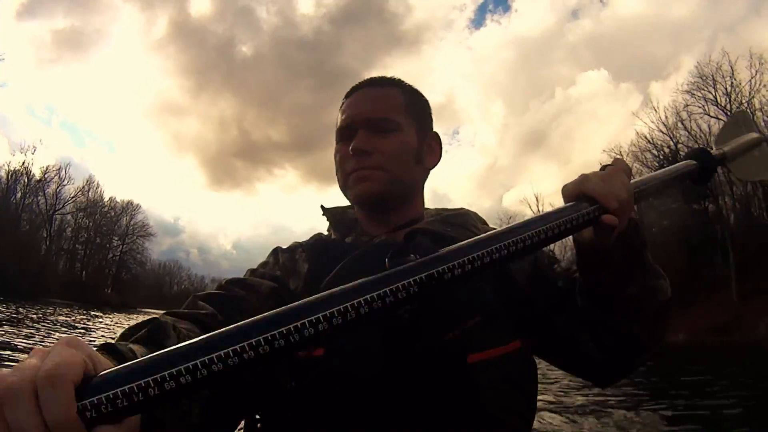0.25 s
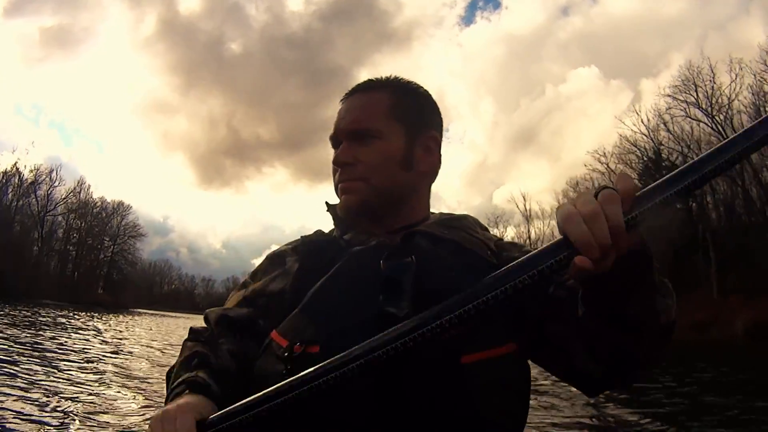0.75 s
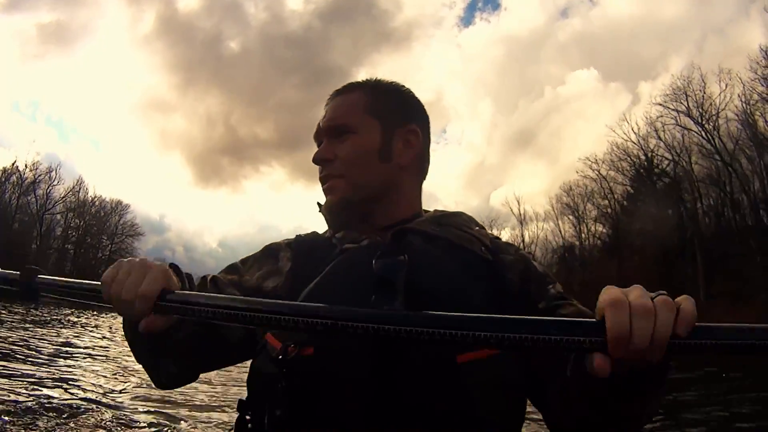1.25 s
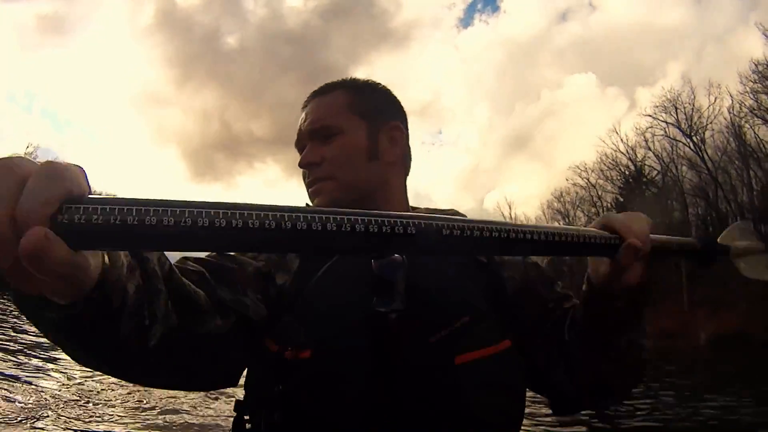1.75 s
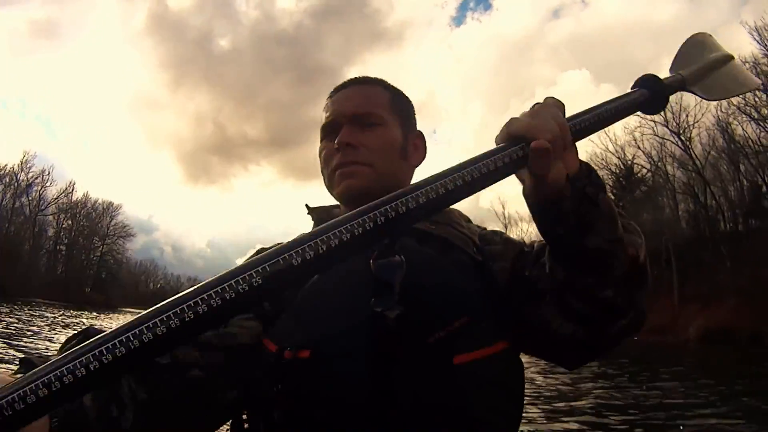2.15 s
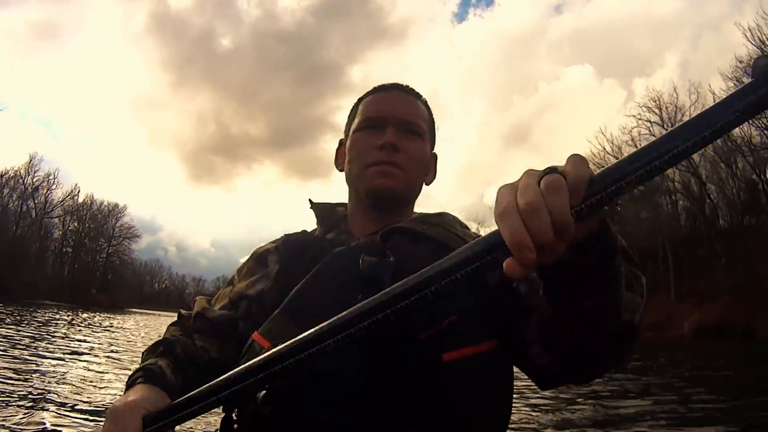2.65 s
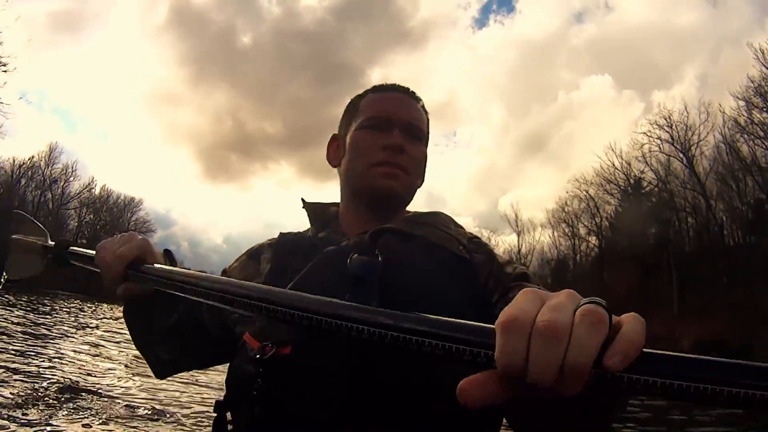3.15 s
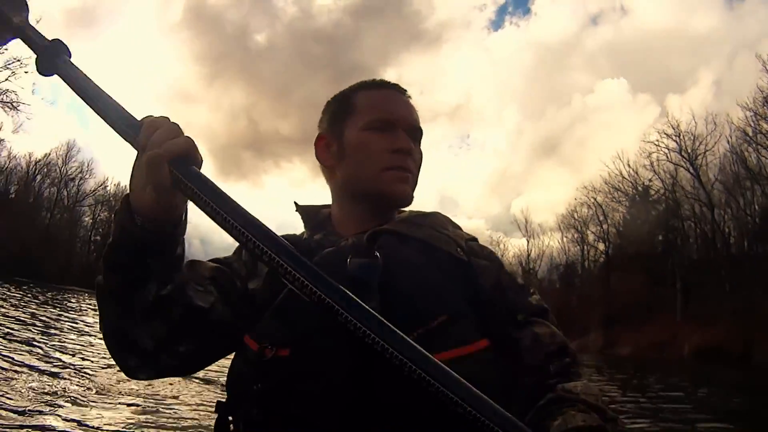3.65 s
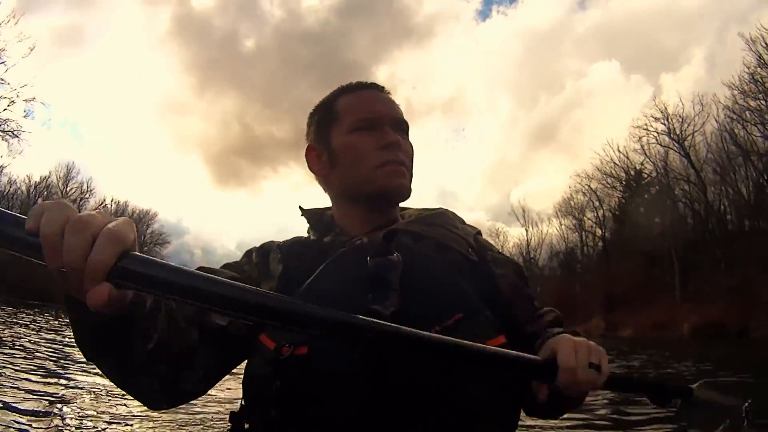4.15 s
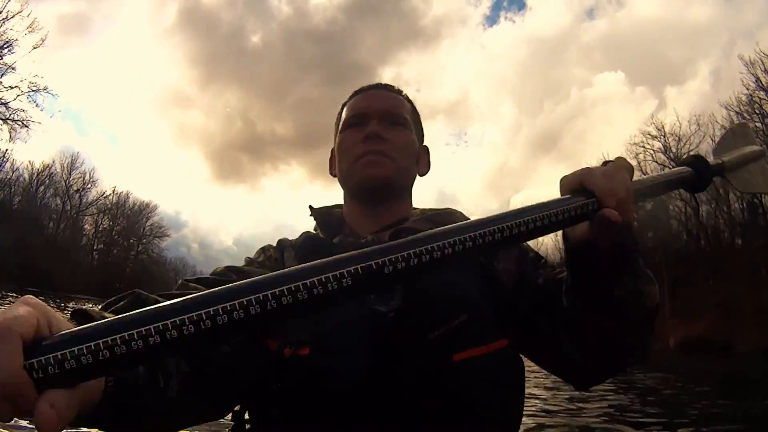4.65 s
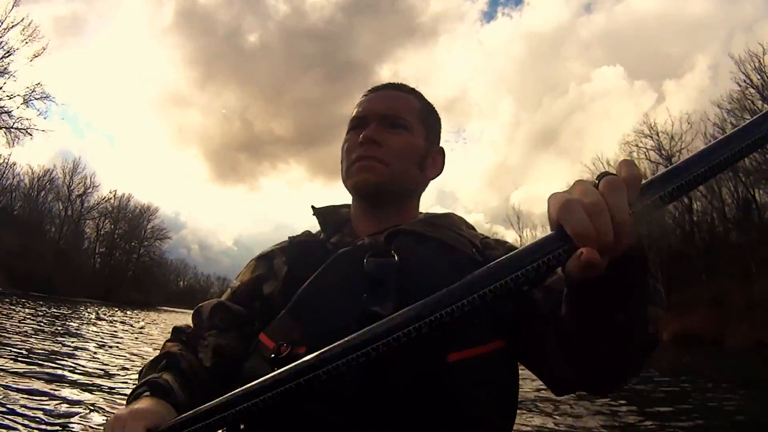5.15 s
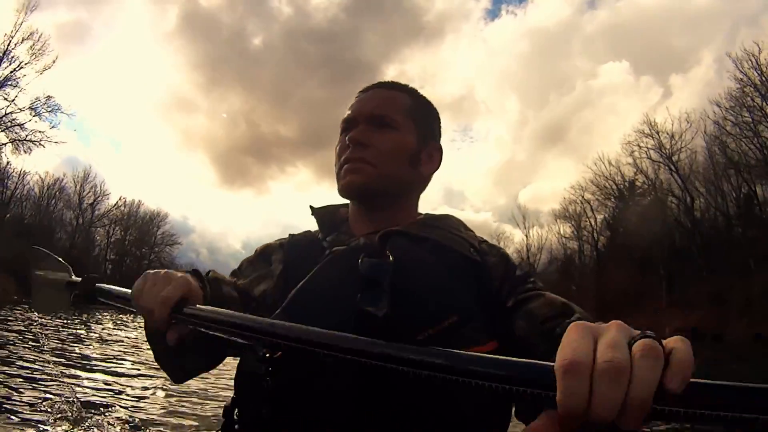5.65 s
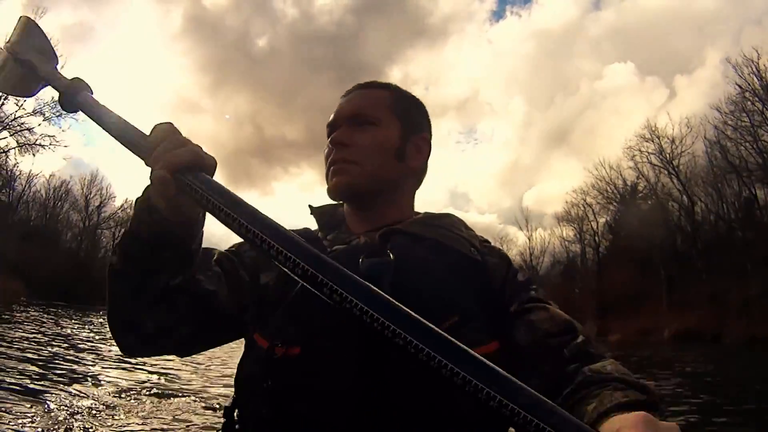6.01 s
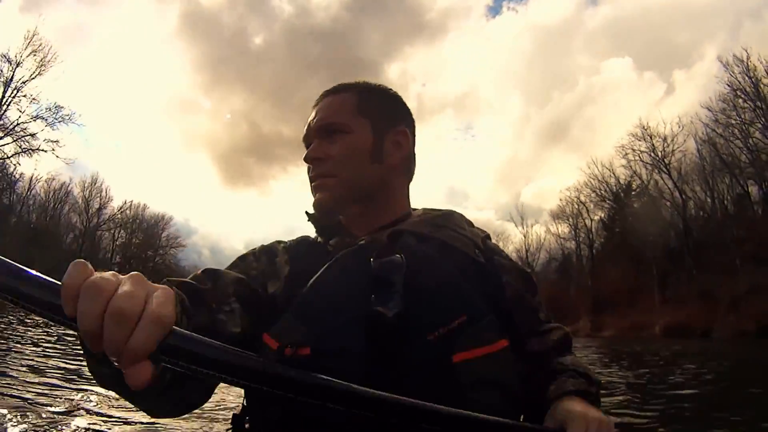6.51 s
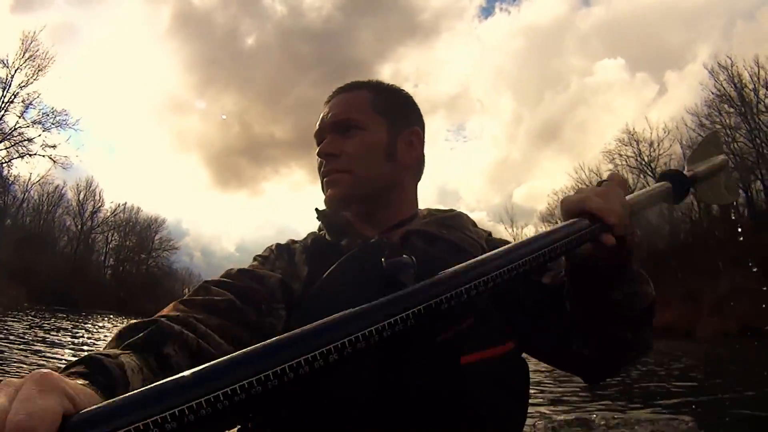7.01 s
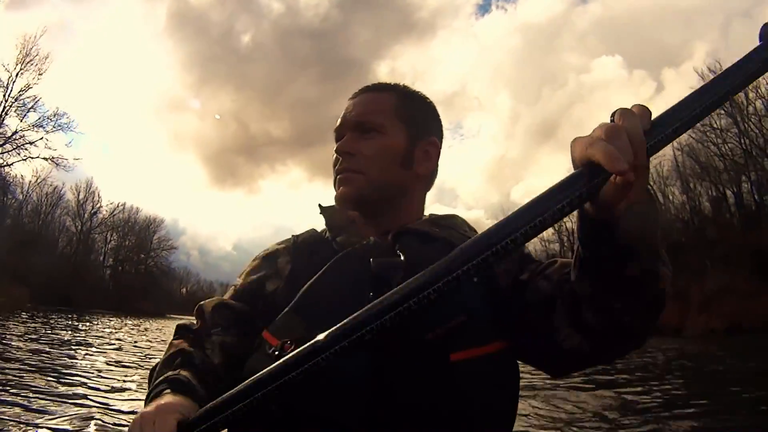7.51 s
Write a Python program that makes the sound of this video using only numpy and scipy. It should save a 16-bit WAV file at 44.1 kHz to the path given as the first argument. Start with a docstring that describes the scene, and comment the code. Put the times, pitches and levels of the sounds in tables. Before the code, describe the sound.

A quiet kayak on open water, heard close from a cased stereo microphone on deck, with little treble at the very top, faint air hiss and a low hull hum. A stroke is already streaming at 0 s; others swell near 1.1, 3.0, 4.2, 5.5 and, strongest, 6.5 s, each a bubbly, fizzing splash that drains into trickles. Between them come small splashes, sharp ticking drips, short swishes, and hollow gulps and slaps along the hull, one clear gulp at 1.4 and another at 6.4. Thin high bird whistles glide faintly from 1.2 to 2.9, clearest at 3.4-4.0, again around 5-6.2 and very faintly at 7.3, with a soft tree echo. At 3.7 a dull, boomy knock hits the hull with a jolt. At 7.5 a louder hollow thud rattles, followed by three lesser bumps until about 7.7 and a last swish.

```python
"""Kayak paddle blades stir a calm lake: bursts of tiny ringing bubbles and filtered noise make the spray.
Gulps and drops are air pockets that ring, with slaps of the wet hull or sharp ticks; swishes are brief noise.
Small birds whistle thinly as gliding sines with a tree echo; hiss and a low hull hum lie beneath.
Twice the hollow hull takes a dull knock, built from decaying modes, and the second is followed by lesser ones.
All is heard through the two ports of a cased camera on the deck."""
import sys
import numpy as np
from scipy import signal
from scipy.fft import rfft, irfft
from scipy.io import wavfile
from scipy.ndimage import uniform_filter1d

SR = 44100
rng = np.random.default_rng(int(sys.argv[2]) if len(sys.argv) > 2 else 0)


def dump_mix(stems):
    """Bounce the given channels to the path in sys.argv[1] as a 16-bit WAV at rate SR."""
    frames = np.atleast_2d(stems).T  # one column per channel
    limited = np.clip(frames, -1, 1)  # hard clip at full scale
    pcm = np.round(limited * 32767).astype(np.int16)
    wavfile.write(sys.argv[1], SR, pcm)


N = 342857  # samples
TIME = np.arange(N) / SR  # s
FREQS = np.fft.rfftfreq(N, 1 / SR)  # Hz


def amp(db):
    """Decibel law: converts a level in dB to an amplitude gain."""
    return 10 ** (np.asarray(db) / 20)


def unit(x):
    """Normalisation: scales a signal to an rms of 1."""
    return x / np.sqrt(np.mean(x ** 2) + 1e-20)


def read(points, hz):
    """Interpolation: reads a table along a log-frequency axis."""
    f, value = np.transpose(points)
    return np.interp(np.log(hz + 1), np.log(f + 1), value)


def coloured(x, points):
    """Linear filtering: shapes a sound by a table of hz and level_db, then sets its rms to 1."""
    return unit(irfft(rfft(x) * amp(read(points, FREQS)), N))


def panned(x, pan_db):
    """Level difference: raises left and lowers right by half of pan_db each."""
    return np.array([amp(pan_db / 2), amp(-pan_db / 2)]).reshape(2, -1) * x


def noise(apart, size=N):
    """Partial coherence: white noise for two ports, a common part plus an opposed part scaled by apart."""
    mid, side = rng.standard_normal((2, size))
    return unit(np.array([mid + apart * side, mid - apart * side]))


def drift(hz):
    """Band-limited fluctuation: a random curve of rms 1, slower than about hz."""
    return unit(irfft(rfft(rng.standard_normal(N)) * np.exp(-(FREQS / hz) ** 2), N))


def add(mix, s, sound):
    """Superposition: adds a sound into the mix, in place, at time s."""
    part = mix[:, max(round(s * SR), 0):][:, :sound.shape[-1]]
    part += sound[..., :part.shape[1]]


def bubble(hz, t60, glide, onset):
    """Bubble resonance: an air pocket rings and dies; a positive glide is its climb as it nears the surface."""
    t = np.arange(int(max(t60, .001) * SR)) / SR
    ring = np.sin(2 * np.pi * hz * t * (1 + glide * t / t60 / 2))
    ring *= amp(-60 * t / t60)
    ring *= 1 - np.exp(-(t / onset) ** 2)
    return ring / (abs(ring).max() + 1e-12)


def swarm(per_s, low_hz, high_hz, cycles, glide, spread_db, width_db, count=48):
    """Shot noise: bubbles of many sizes burst at random moments, each size from its own direction."""
    out = np.zeros((2, N))
    sizes_hz = np.geomspace(low_hz, high_hz, count)
    for hz, (life, bend, place, lag) in zip(sizes_hz, rng.standard_normal((count, 4))):
        t60 = cycles * np.exp(.5 * life) / hz
        ring = bubble(hz, t60, glide * (1 + 2 * bend), t60 / 10)
        at, size = rng.random((2, 1500))
        born = int(min(per_s * N / SR / count, len(at)))
        # exponentially distributed levels, limited at 3.5 times spread_db
        size_db = spread_db * np.minimum(-np.log(size[:born]), 3.5)
        moments = (at[:born] * N).astype(int)
        train = np.bincount(moments, amp(size_db), N)
        sound = signal.oaconvolve(train, ring * np.sqrt(hz) / np.linalg.norm(ring))[:N]
        delayed = np.roll(sound, round(lag * .8))  # lag in samples
        out += panned(np.array([sound, delayed]), width_db * place)
    return unit(out)


RISE_DB = 22  # swell of the water over each rise time


def surge(s, rise_s, hold_s, fall_db_per_s):
    """Exponential growth and decay: water wells up until time s, keeps running, then dies away."""
    rise_db = -RISE_DB * np.maximum(s - TIME, 0) / rise_s
    fall_db = -fall_db_per_s * np.maximum(TIME - s - hold_s, 0)
    return amp(rise_db + fall_db)


# a blade sweeps back and lifts out, streaming:
# (peak_start_s [s], rise_s [s], hold_s [s], spray_db [dB], churn_db [dB], lap_db [dB], left_right_db [dB])
BLADE_STROKES = [(0.0, .05, .06, -48, -52, -52, -2), (1.06, 0.23, 0.15, -47, -67.5, -60, 1.5),
                 (3.019, .1, 0.14, -48, -58, -49.5, 3.5), (4.208, 0.079, 0.22, -44, -55, -56, -1),
                 (5.473, 0.18, 0.35, -49, -62, -61.5, 2), (6.537, 0.11, 0.22, -40.5, -48.5, -49.5, -3)]
# small splashes, as a blade cuts in or sheds a string of water:
# (peak_start_s [s], hold_s [s], spray_db [dB], churn_db [dB], left_right_db [dB])
SMALL_SPLASHES = [(0.342, 0.043, -46.5, -59, 5), (0.725, 0.095, -58, -58.5, 5),
                  (1.057, 0.016, -43.5, -50, 2), (1.179, 0.023, -50, -55, -4), (1.961, 0.1, -48, -60, 6.5),
                  (2.382, 0.092, -49, -59.5, 3), (2.887, 0.075, -48, -56, 4), (3.016, 0.028, -42.5, -49, 1),
                  (3.512, 0.018, -47.5, -68, 0), (3.697, 0.062, -54, -59, 0), (4.076, 0.16, -51, -52, -6),
                  (4.31, 0.054, -41.5, -56, -4), (4.754, 0.081, -53, -57.5, 4), (4.955, 0.19, -58, -61, 5),
                  (5.461, 0.032, -42.5, -56, -0.5), (5.593, 0.037, -49, -45, 3),
                  (5.976, 0.086, -48.5, -60, -2.5), (6.832, 0.21, -45, -61, -3),
                  (7.118, 0.047, -49, -55, 0), (7.196, 0.042, -49, -60, -2), (7.288, 0.08, -49.5, -65, -1)]
DRAIN_DB_PER_S, SETTLE_DB_PER_S = 79, 64  # the blade drains quickly, the lake settles more slowly
TRICKLE_DB, TRICKLE_DB_PER_S = -12.5, 18  # a raised blade trickles on; level relative to the stream
SPLASH_RISE_S, SPLASH_FALL_DB_PER_S = 0.0046, 330
# between strokes the gliding hull keeps a little water moving
CALM_SPRAY_DB, CALM_CHURN_DB, CALM_LAP_DB = -59, -63, -61.5


def stirring():
    """Power addition: strokes, splashes and calm gliding sum as powers to drive spray, churn and lapping."""
    spray, churn, lap = amp(CALM_SPRAY_DB) ** 2, amp(CALM_CHURN_DB) ** 2, amp(CALM_LAP_DB) ** 2
    for s, rise, hold, spray_db, churn_db, lap_db, pan_db in BLADE_STROKES:
        stream = surge(s, rise, hold, DRAIN_DB_PER_S)
        wake = surge(s, rise, hold, SETTLE_DB_PER_S)
        trickle = amp(TRICKLE_DB) * surge(s, rise, hold, TRICKLE_DB_PER_S)
        spray = spray + panned(amp(spray_db) * np.hypot(stream, trickle), pan_db) ** 2
        churn = churn + (amp(churn_db) * stream) ** 2
        lap = lap + (amp(lap_db) * wake) ** 2
    for s, hold, spray_db, churn_db, pan_db in SMALL_SPLASHES:
        burst = surge(s, SPLASH_RISE_S, hold, SPLASH_FALL_DB_PER_S)
        spray = spray + panned(amp(spray_db) * burst, pan_db) ** 2
        churn = churn + (amp(churn_db) * burst) ** 2
    return np.sqrt(spray), np.sqrt(churn), np.sqrt(lap)


# spectrum of the spray's small bubbles and fizz: (hz [Hz], level_db [dB, relative])
SPRAY_COLOUR = [(1200, -14.5), (2100, -9.5), (2600, 2.5), (3300, -3.5), (4100, -6), (5100, -2), (6400, -11),
                (7600, -5.5), (8800, -13), (10000, -22), (11000, -20.5)]
# spectrum of the larger bubbles and foam below: (hz [Hz], level_db [dB, relative])
CHURN_COLOUR = [(500, -41), (900, -7), (1250, 7.5), (1450, -2), (1650, 3.5), (2100, -10), (2800, 6.5)]


def splashes(spraying, churning, spray_db=0, fizz_db=-3, churn_db=0, foam_db=-5, chirp_db=-7):
    """Bubble acoustics: falling clumps of water ring tiny bubbles, chirps and fizz over larger bubbles."""
    ticks = swarm(per_s=3200, low_hz=1790, high_hz=10880, cycles=28.3, glide=0.086, spread_db=6.0, width_db=8)
    # cavities that open and close sweep in pitch
    chirps = swarm(per_s=220, low_hz=2000, high_hz=6500, cycles=110, glide=.16, spread_db=4, width_db=3)
    fizz = amp(fizz_db) * noise(apart=0.55)
    spray = coloured(ticks + amp(chirp_db) * chirps + fizz, SPRAY_COLOUR) * amp(spray_db) * spraying
    blobs = swarm(per_s=360, low_hz=820, high_hz=2315, cycles=35, glide=0.107, spread_db=4.5, width_db=8.5)
    foam = amp(foam_db) * noise(apart=1.0)
    churn = coloured(blobs + foam, CHURN_COLOUR) * amp(churn_db) * churning
    clumps = amp(1.3 * drift(hz=50))
    return (spray + churn) * clumps


# spectrum of the lapping along the hull: (hz [Hz], level_db [dB, relative])
LAP_COLOUR = [(50, -34), (150, 11), (350, -13.5), (490, 4.5), (600, -7.5), (770, -4), (950, -4),
              (1400, -27)]


def lapping(stirred, lap_db=-4.5, wash_db=-6):
    """Bubble resonance: large, low bubbles gurgle along the hull in a noisy wash."""
    blobs = swarm(per_s=130, low_hz=300.4, high_hz=1082, cycles=32.6, glide=0.11, spread_db=2.5, width_db=-3)
    wash = amp(wash_db) * noise(apart=0.1)
    return coloured(blobs + wash, LAP_COLOUR) * amp(lap_db) * stirred


# spectrum of the open-air hiss: (hz [Hz], level_db [dB, relative])
HISS_COLOUR = [(15, -48), (25, -24), (107, 4.5), (322, -8), (509, -10.5), (609, -18.5), (747, -2.5),
               (871, -13.5), (1280, -15.5), (1970, -19.5), (2680, -13.5), (3550, -17), (5070, -19),
               (8680, -20), (11200, -26.5), (14600, -59), (22000, -120)]
# spectrum of the hull's hum: (hz [Hz], level_db [dB, relative])
HUM_COLOUR = [(45, -20), (70, -13), (92, 14), (135, 2.5), (190, -6.5), (350, -31)]


def background(hiss_db=-55.0, drone_db=-62):
    """Broadband noise and flow excitation: a faint air hiss, and the hull humming as water rubs along it."""
    hiss = coloured(noise(apart=0.25), HISS_COLOUR) * amp(hiss_db)
    unevenness = amp(2 * drift(hz=12))
    hum = coloured(noise(apart=0.033), HUM_COLOUR) * amp(drone_db)
    return hiss + hum * unevenness


# air pockets closing against the hull, each begun 2 ms before its listed time:
# (start_s [s], level_db [dB, before the gains below], pitch_hz [Hz], slap_db [dB re level_db])
AIR_GULPS = [(0.209, -42.5, 824, -6), (0.657, -41, 478, -10), (0.751, -40.5, 750, -22),
             (0.785, -41, 780, -0.5), (1.008, -39.5, 737, -15), (1.199, -41.5, 740, -13),
             (1.364, -30.5, 761, -18.5), (1.474, -44, 753, -8), (1.51, -42, 666, -2),
             (1.911, -42, 807, -25), (2.065, -39, 745, -2), (2.266, -48, 733, -12),
             (2.386, -45.5, 1750, 1.5), (2.41, -46.5, 1540, 3.5), (2.614, -37, 930, -0.5),
             (2.644, -43, 896, -1), (2.764, -38, 780, -1), (2.827, -43.5, 1610, -2),
             (2.959, -37, 1636, -14), (3.063, -38.5, 730, -2), (3.119, -41, 454, -5), (3.237, -41, 876, -3),
             (3.253, -42, 1090, -12), (3.405, -36, 486, -29), (3.431, -35.5, 762, -10),
             (3.607, -41, 727, -2), (4.141, -37.5, 906, -15), (4.206, -36.5, 506, 2),
             (4.271, -39, 1220, -9), (4.436, -49, 760, 0), (4.72, -44.5, 1520, 4), (4.884, -40.5, 790, 1),
             (5.051, -44.5, 786, -1), (5.091, -40.5, 867, 1), (5.141, -46, 790, 2), (5.345, -46.5, 807, -1),
             (5.389, -44.5, 925, 0), (5.52, -39, 476, -5), (5.581, -38, 1550, -23), (5.61, -35, 704, -15),
             (5.776, -45, 680, 0), (6.272, -41.5, 756, 4), (6.432, -32, 761, -3.5), (6.583, -41, 516, 0.5),
             (6.636, -35.5, 1500, -10.5), (6.736, -36.5, 1290, -6), (6.786, -38, 812, -5),
             (7.038, -42.5, 755, -5), (7.316, -42.5, 907, -16), (7.348, -37.5, 1352, -31)]
# modes of the wet hull skin, as a lap of water rings it: (pitch_hz [Hz], level_db [dB, relative], t60_s [s])
SKIN_MODES = [(389, -2, 0.058), (503, -1.5, 0.069), (768, -0.5, 0.059), (933, -9.5, 0.12),
              (1223, -11.5, 0.039), (1590, -5.5, 0.088), (1600, -23, 0.065)]
GULP_CYCLES = 60  # every pocket takes about as many cycles to fall 60 dB, so large ones last longer


def gulps(gulp_db=-2, glide=0.028, onset=0.0042, slap_db=0, slap_s=0.0042):
    """Cavity resonance: each pocket rings at its own pitch while the water around it slaps the hull's modes."""
    out, t = np.zeros((2, N)), TIME[:SR // 6]
    skin = sum(amp(db - 60 * t / t60) * np.sin(2 * np.pi * hz * t) for hz, db, t60 in SKIN_MODES)
    for s, db, hz, hull_db in AIR_GULPS:
        ring = bubble(hz, GULP_CYCLES / hz, glide, onset)
        add(out, s - .002, amp(db + gulp_db) * ring)
        push = noise(apart=0.1, size=len(t)) * t * np.exp(-t / slap_s)
        slap = signal.fftconvolve(push, skin[None])
        add(out, s - .002, amp(db + hull_db + slap_db) * slap / abs(slap).max())
    return out


# brief swishes of thrown water: (start_s [s], level_db [dB], length_s [s], splat_db [dB re level_db])
WATER_SWISHES = [(0.366, -42, 0.017, -36), (0.617, -56.5, 0.029, 6.5), (0.892, -42.5, 0.047, -7),
                 (2.062, -58.5, 0.039, 11.5), (2.892, -41.5, 0.027, -5.5), (4.767, -47, 0.02, -16),
                 (7.734, -38, 0.037, -7)]


def swishes():
    """Turbulent noise: thin sheets of water tear in a short, grainy rush with a low splat beneath."""
    level, low = np.zeros((2, 1, N))
    for s, db, length, splat_db in WATER_SWISHES:
        size = int(length * SR)
        shape = signal.windows.tukey(size, .06) * np.linspace(1.2, .7, size)
        add(level, s, amp(db) * shape)
        add(low, s, amp(db + splat_db) * shape)
    # spectra as (Hz, relative dB)
    rush = coloured(noise(apart=0.44), [(1000, -7), (2000, 3), (2800, 8.5), (5000, 2), (11000, -5)])
    splat_colour = [(100, -18), (400, 0.5), (800, 3), (1400, 4), (2200, -17.0), (4000, -28)]
    splat = coloured(noise(apart=0.34), splat_colour)
    grain = amp(2.0 * drift(hz=200))
    return (level * rush + low * splat) * grain


# wavelets bump the hull and sound its lowest mode: (start_s [s], level_db [dB, peak])
WAVELET_BUMPS = [(0.545, -47), (2.125, -49), (3.535, -39), (3.569, -41.5), (4.71, -47), (5.037, -48),
                 (7.231, -46)]
BUMP_HZ, BUMP_T60_S, BUMP_RISE_S = 98.3, 0.2, 0.0093


def bumps():
    """Modal excitation: a soft push of water makes the hull hum for a moment at its lowest mode."""
    out = np.zeros((2, N))
    for s, db in WAVELET_BUMPS:
        add(out, s, amp(db) * bubble(BUMP_HZ, BUMP_T60_S, 0, BUMP_RISE_S))
    return out


# drops and small slaps of water, each begun 1 ms after its listed time:
# (start_s [s], level_db [dB, before drop_db], pitch_hz [Hz, band centre and ring],
#  left_right_db [dB], t60_s [s, at least 3 ms is used])
WATER_DROPS = [(0.6075, -31, 2660, 6, 0.037), (0.6328, -34.5, 5160, -3, 0.018), (0.9, -31, 3400, 1, 0.026),
               (0.9116, -25.5, 4530, 0.0, 0.017), (0.993, -22.5, 5050, -2, 0.022),
               (1.047, -33.5, 2620, 0, 0.014), (1.1875, -35, 5170, 3, 0.083),
               (1.4188, -39.5, 2960, -0.5, 0.025), (2.469, -38, 3030, 7, 0.0099),
               (2.8953, -22, 5230, 4, 0.0092), (2.9156, -30.5, 2500, 1, 0.013),
               (3.693, -30.5, 5200, 1, 0.013), (4.072, -42.5, 2680, -4, 0.02),
               (4.306, -31.5, 5030, -2.0, 0.023), (4.3234, -30, 4750, -2, 0.023),
               (5.0805, -28.5, 7770, -8, 0.012), (5.2755, -37, 3800, 4, 0.013),
               (5.4752, -36, 3500, 1, .015), (5.858, -29.5, 2530, 3, 0.012),
               (6.228, -37.5, 5600, -6, 0.0095), (6.244, -35, 2900, -3, .018),
               (6.2625, -34, 3800, -4.0, 0.0051), (6.4822, -36, 2600, -2, 0.023),
               (6.554, -26.5, 2540, -3, 0.04), (6.7103, -29, 3240, -3.0, 0.029),
               (6.7616, -30.5, 2800, 1, 0.021), (7.0445, -29.5, 7700, -4, 0.013),
               (7.1008, -31.5, 2136, 2.5, 0.085), (7.3466, -28, 2640, 7.0, 0.0085)]


def drops(drop_db=4, ring_db=-2, climb_per_s=14, rise_cycles=1.86, octaves=0.87, impact_db=6, impact_t60=0.0041):
    """Impact and entrained air: a drop ticks sharply, sputters and leaves a short bubble that climbs in pitch."""
    out, t = np.zeros((2, N)), np.arange(4096) / SR
    f = np.fft.rfftfreq(len(t), 1 / SR) + 1  # the 1 Hz offset avoids a zero
    for s, db, hz, pan, t60 in WATER_DROPS:
        band = np.exp(-(np.log2(f / hz) / octaves) ** 2 / 2)
        band = band / (1 + (1700 / f) ** 4)  # reduces the lows
        sputter = unit(irfft(rfft(noise(apart=.3, size=len(t))) * band))
        ring = np.sin(2 * np.pi * hz * t * (1 + climb_per_s * t / 2))
        tail = (sputter + amp(ring_db) * ring) * amp(-60 * t / max(t60, .003))
        tick = ring * amp(impact_db - 60 * t / impact_t60)
        hit = (tail + tick) * (1 - np.exp(-(t * hz / rise_cycles) ** 2))
        add(out, s + .001, panned(hit / abs(hit).max() * amp(db + drop_db), pan))
    return out


# bird whistles: (start_s [s], length_s [s], level_db [dB, before bird_db], note [name])
BIRD_WHISTLES = [(1.246, 0.2, -59, "high"), (1.413, .12, -54, "level"), (1.777, 0.33, -52, "rising"),
                 (2.11, 0.34, -56, "soaring"), (2.546, 0.25, -59.5, "high"), (2.817, 0.087, -55, "level"),
                 (3.396, 0.33, -48.5, "rising"), (3.744, 0.28, -46, "soaring"), (4.934, .24, -60.5, "high"),
                 (5.178, 0.31, -62.5, "level"), (5.61, .30, -53.5, "rising"), (5.923, .29, -52, "soaring"),
                 (7.273, 0.37, -60, "level")]
# the four notes of the birds' phrase, before smoothing and waver:
# name: (start_hz [Hz], early_hz [Hz], late_hz [Hz], end_hz [Hz])
BIRD_NOTES = {"high": (8900, 8950, 9060, 9030), "level": (8660, 8610, 8770, 8780),
              "rising": (8540, 8370, 8770, 8960), "soaring": (8600, 8360, 8870, 9420)}


def birds(bird_db=-4.0, waver_hz=36, flutter_db=3.5, echo_db=-7, echo_t60=1.0, pan_db=6):
    """Frequency modulation and scattering: nearly pure whistles glide and waver, scattered by the trees."""
    song, waver = np.zeros((1, N)), waver_hz * drift(hz=150)
    for s, length, db, note in BIRD_WHISTLES:
        u = np.linspace(0, 1, int(length * SR))  # fraction of the whistle
        glide = np.interp(u, [0, .13, .7, 1], BIRD_NOTES[note])
        glide = uniform_filter1d(glide, len(u) // 6, mode="nearest")
        swell = np.interp(u, [0, .08, .7, 1], [0, 1, 1, .1])
        hz = glide + waver[round(s * SR):][:len(u)]
        whistle = np.sin(2 * np.pi * np.cumsum(hz) / SR)
        add(song, s, amp(db + bird_db) * swell * whistle)
    song = song * amp(flutter_db * drift(hz=41))
    trees = rng.standard_normal((2, SR // 2)) * amp(-60 * TIME[:SR // 2] / echo_t60)
    echo = signal.fftconvolve(song, trees / np.linalg.norm(trees[0]), axes=1)[:, :N]
    return panned(song + amp(echo_db) * echo, pan_db)


# blows on the hull:
# (start_s [s], boom_db [dB], contact_db [dB], rattle_db [dB], rattle_t60_s [s])
HULL_KNOCKS = [(3.7132, -10, -22.5, -21.5, 0.2), (7.532, -3, -19.5, -24, 0.58),
               (7.583, -19, -33, -41, 0.14), (7.636, -15, -46, -34, 0.21),
               (7.699, -21.5, -31.5, -37.5, 0.47)]
# modes of the hollow hull: (pitch_hz [Hz], level_db [dB, relative], t60_s [s])
HULL_MODES = [(98, -13.5, 0.3), (129, 1.5, 0.092), (159, -4.5, 0.053), (241, -14, 0.041), (318, -24, 0.14),
              (417, -16.5, 0.043), (494, -22, 0.22), (636, -35, 0.033), (725, -22, 0.15),
              (896, -9.5, 0.024), (1320, -28, 0.034), (1510, -33.5, 0.078), (1620, -23, 0.024)]
# spectrum of the loose fittings: (hz [Hz], level_db [dB, relative])
RATTLE_COLOUR = [(25, -4), (60, -11.5), (100, 10), (200, 13.5), (300, 3), (500, -1), (750, -7.5),
                 (1000, -8.5), (1400, -27.5), (2500, -28), (8000, -44)]


def knocks(onset=0.0041, rattle_onset=0.00055, crack_t60=0.041):
    """Modal synthesis: the hollow hull booms, the contact cracks, and loose fittings rattle on."""
    out, t = np.zeros((2, N)), np.arange(SR // 2) / SR
    boom = sum(amp(db - 60 * t / t60) * np.sin(2 * np.pi * hz * t) for hz, db, t60 in HULL_MODES)
    boom = boom * (1 - np.exp(-t / onset))
    # the camera's microphones cut the lowest part of the boom
    boom = signal.sosfilt(signal.butter(3, 70, "highpass", fs=SR, output="sos"), boom)
    rattle = coloured(noise(apart=0.07), RATTLE_COLOUR)
    crack_colour = [(100, 12.5), (400, 7), (900, 5.0), (1300, -8), (1800, -8), (4000, -23), (9000, -68)]
    crack = coloured(noise(apart=0.64), crack_colour)
    for s, db, contact_db, rattle_db, t60 in HULL_KNOCKS:
        span = np.arange(len(t)) + round(s * SR)
        shake = rattle.take(span, axis=1, mode="wrap") * amp(rattle_db - 60 * t / t60)
        shake = shake * (1 - np.exp(-t / rattle_onset))
        contact = crack.take(span, axis=1, mode="wrap") * amp(contact_db - 60 * t / crack_t60)
        add(out, s, amp(db) * boom + shake + contact)
    return out


# the hard blows jolt the camera mount:
# (centre_s [s], level_db [dB, before push_factor], width_s [s], push_factor [ratio, positive left])
MOUNT_JOLTS = [(3.716, -8, 0.0003, 1), (3.723, -3, 0.00026, 1), (7.5368, -6, 0.00045, -1.76)]


def jolts():
    """Antiphase motion: short Gaussian pushes drive the two ports in opposite directions."""
    push = sum(side * amp(db) * np.exp(-((TIME - s) / width) ** 2 / 2) for s, db, width, side in MOUNT_JOLTS)
    return np.array([push, -push])


# phase between the two ports: (hz [Hz], left_lead_rad [rad, limited to 2.2 either way])
PHASE_LEAD = [(40, -.15), (130, -.35), (300, -.9), (600, -1.9), (900, -1.5), (1350, -1.8), (1600, -1.1),
              (2100, -1.1), (2550, .1), (2850, -1.2), (4500, -.35), (7000, -.5), (11000, 0)]
# level between the two ports: (hz [Hz], left_right_db [dB])
LEVEL_BALANCE = [(100, 0.6), (400, -1), (720, -.5), (880, -4), (1200, -1), (2200, -3.5), (2600, 5),
                 (3100, -1.5), (7000, 0.5), (11000, 1.5)]


def ports(x):
    """Interchannel phase and level: the case shifts and colours the sound at each port."""
    half = np.clip(read(PHASE_LEAD, FREQS) / 2, -1.1, 1.1)
    # the cosine keeps the level of the ports' sum, before the balance is applied
    turn = np.exp(1j * np.array([half, -half])) / np.cos(half)
    return irfft(rfft(x) * panned(turn, read(LEVEL_BALANCE, FREQS)), N)


def scene():
    """Superposition: water, hull, birds and air pass the two ports, then the jolts are added."""
    spray, churn, lap = stirring()
    water = splashes(spray, churn) + lapping(lap) + gulps() + drops() + swishes()
    return ports(water + knocks() + bumps() + birds() + background()) + jolts()


EDGE_HZ = 11200  # upper edge of the band


def record(dry):
    """Clipping and band limiting: peaks are cut flat at 0.95, then the top of the band is removed."""
    lowpass = signal.firwin(401, EDGE_HZ, window=("kaiser", 8), fs=SR)
    return signal.oaconvolve(np.clip(dry, -.95, .95), lowpass[None], "same")


dry = scene()
out = record(dry)
dump_mix(out)
```